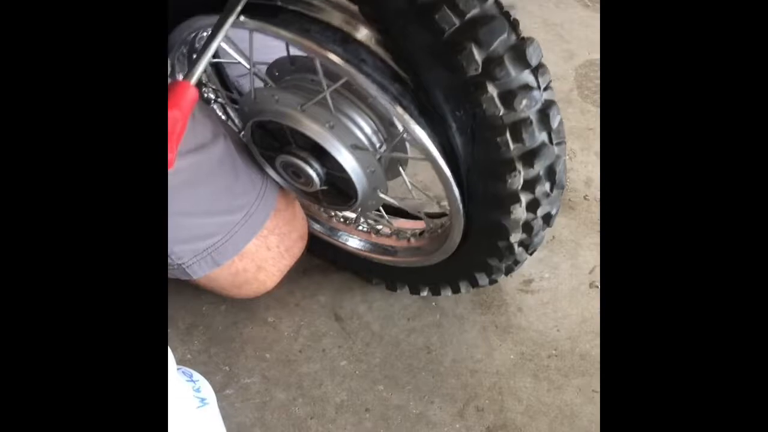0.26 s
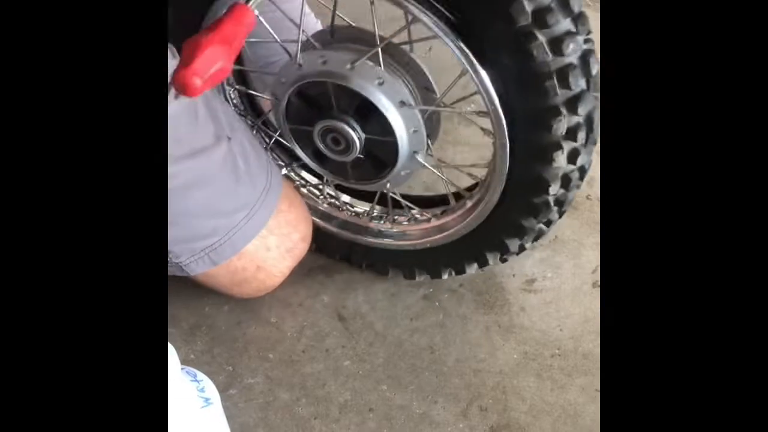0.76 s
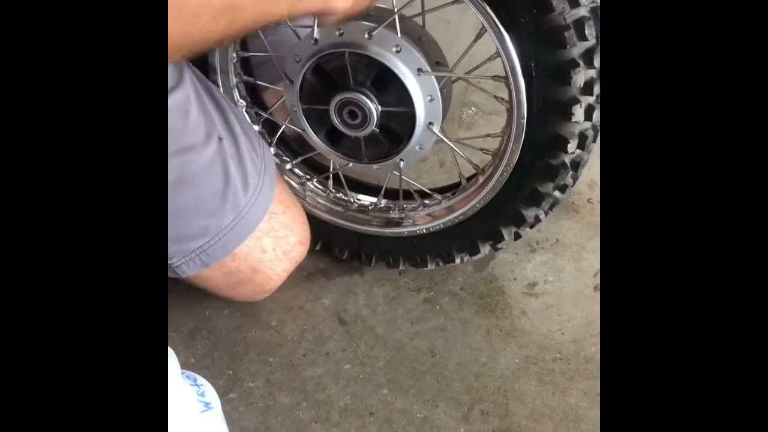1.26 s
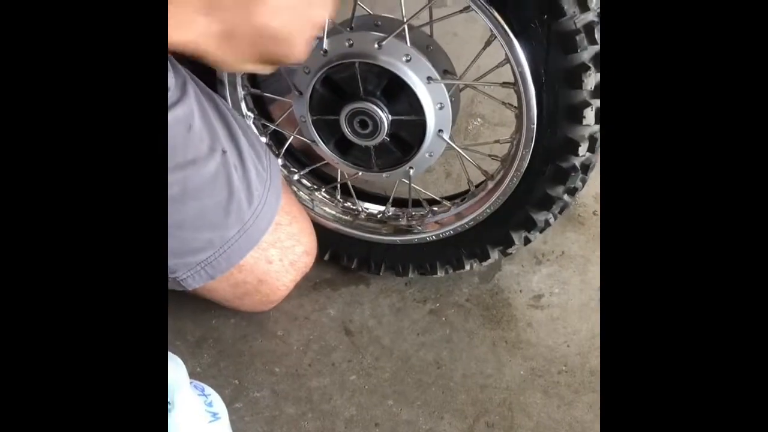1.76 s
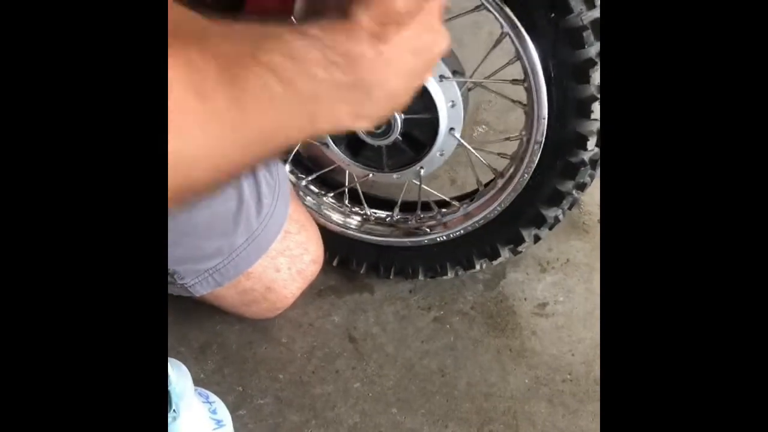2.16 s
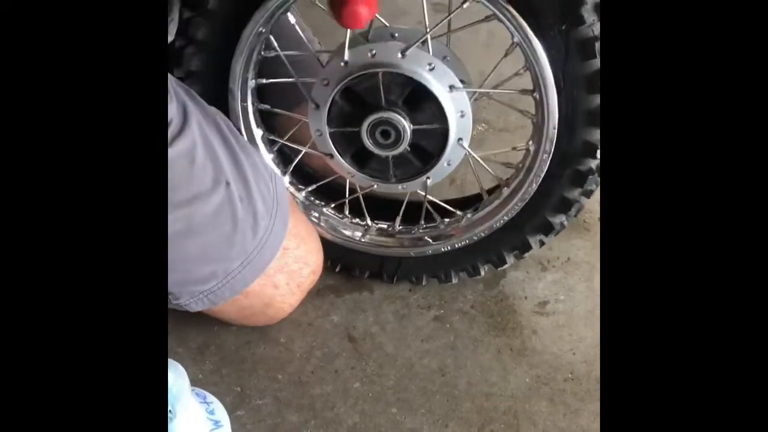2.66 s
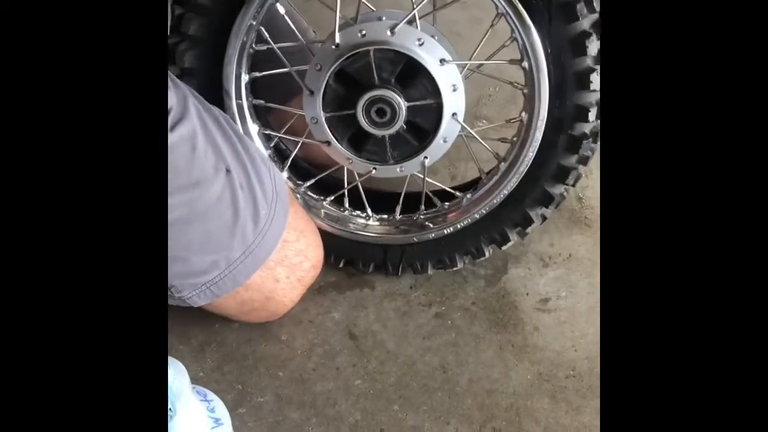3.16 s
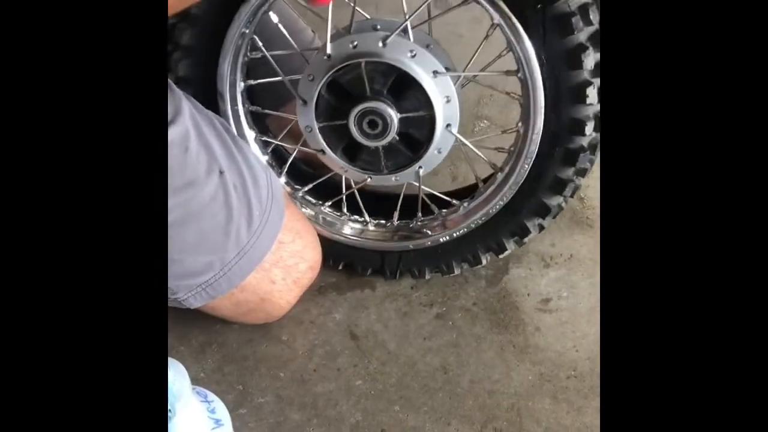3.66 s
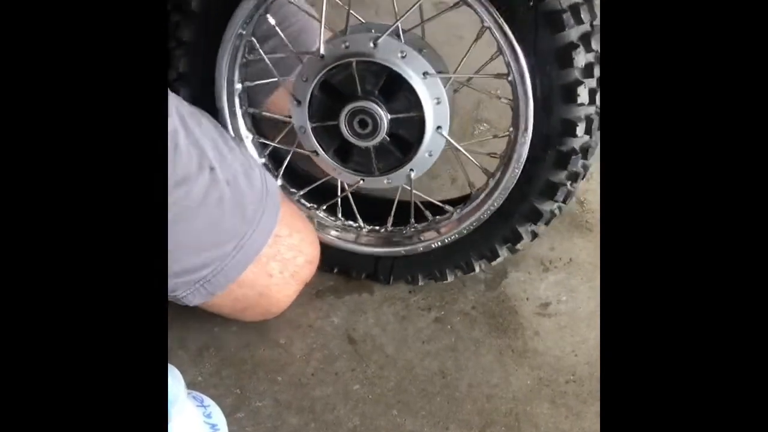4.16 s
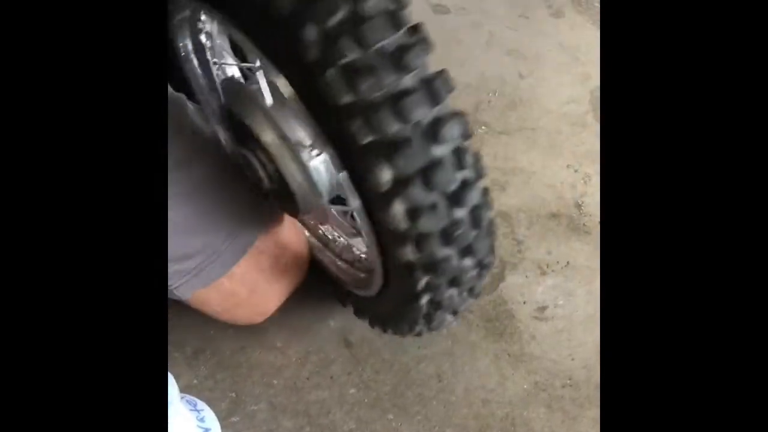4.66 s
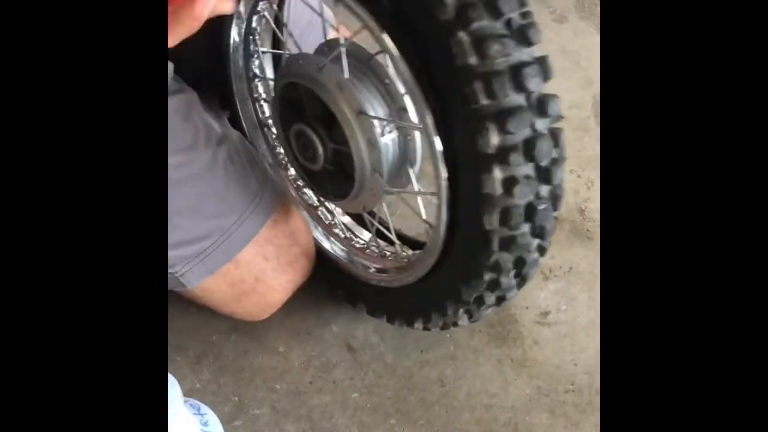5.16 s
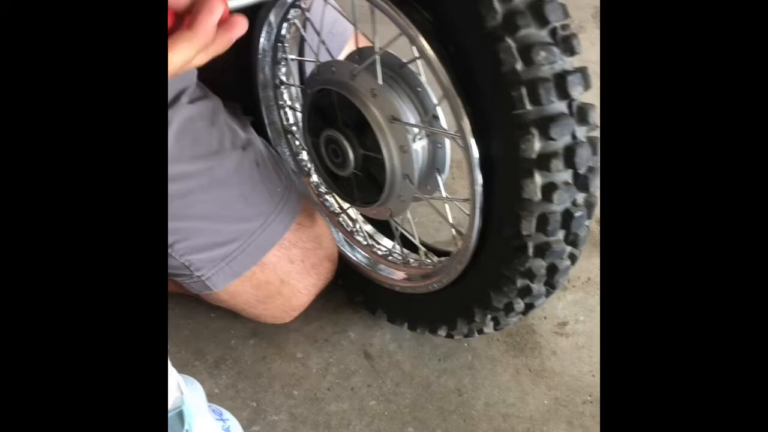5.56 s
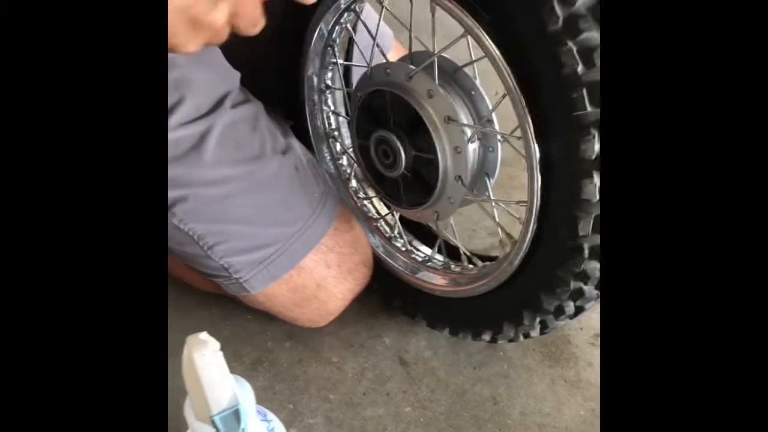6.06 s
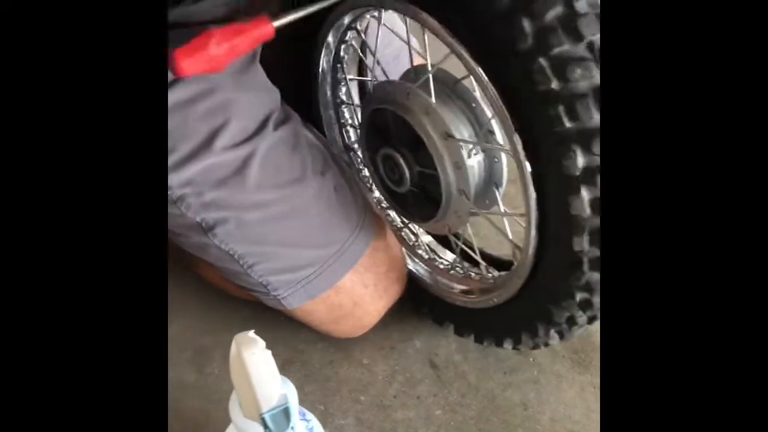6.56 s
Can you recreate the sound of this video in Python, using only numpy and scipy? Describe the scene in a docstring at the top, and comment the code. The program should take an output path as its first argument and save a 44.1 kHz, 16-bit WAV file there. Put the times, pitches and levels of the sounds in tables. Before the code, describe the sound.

Steel tire levers clink, scrape and bounce on a spoked wheel rim while rubber rubs and thumps heavily in a garage.

```python
"""Steel tire levers work a knobby tire onto a spoked wheel on a garage floor.
Over air noise and a low hum a faint steel ring dies away, while rubber rubs in strokes and thumps softly.
From 1 s a lever clinks and slides on the rim; then come groans, jerks, knocks and ever faster bounces.
Rubber rubs on with tiny snaps; a knock and loud thumps follow at 4.2 s, knocks and slides from 5.3 s,
then clinks, bounces and grinding. Blows excite damped modes, friction is many slips, and the garage rings."""
import sys
import numpy as np
from scipy import signal
from scipy.fft import rfft, irfft
from scipy.io import wavfile

SR = 44100
rng = np.random.default_rng(int(sys.argv[2]) if len(sys.argv) > 2 else 0)


def log_audio(samples):
    """Write samples as a 16-bit WAV file to the path given in sys.argv[1]."""
    # one column per channel
    frames = np.atleast_2d(samples).T
    # limit to full scale, then quantise
    limited = np.clip(frames, -1, 1)
    pcm = np.round(limited * 32767).astype(np.int16)
    wavfile.write(sys.argv[1], SR, pcm)


N = 300762
TIME = np.arange(N) / SR


def amp(db):
    """Level law: decibels to amplitude gain."""
    return 10 ** (np.asarray(db) / 20)


def rms(x):
    """Effective value: root of the mean square."""
    return np.sqrt(np.mean(x ** 2) + 1e-20)


def read(points, hz):
    """Logarithmic pitch scale: a table is interpolated over log frequency."""
    f, value = np.transpose(points)
    return np.interp(np.log(hz + 1), np.log(f + 1), value)


def add(mix, s, sound):
    """Superposition: a sound is summed into the mix from time s."""
    part = mix[max(round(s * SR), 0):][:len(sound)]
    part += sound[:len(part)]


def colour(x, points, size=4096):
    """Minimum-phase filtering: a causal filter with the given spectrum; the result has rms 1."""
    log_gain = np.log(amp(read(points, abs(np.fft.fftfreq(size, 1 / SR)))))
    spectrum = np.exp(np.conj(signal.hilbert(log_gain)))
    taps = np.fft.ifft(spectrum).real[:size // 2]
    y = signal.fftconvolve(x, taps)[:len(x)]
    return y / rms(y)


def wander(length, rate_hz):
    """Low-pass noise: slow chance with rms 1."""
    hz = np.fft.rfftfreq(length, 1 / SR)
    y = irfft(rfft(rng.standard_normal(length)) * np.exp(-(hz / rate_hz) ** 2), length)
    return y / rms(y)


# spectrum of the steady air noise: frequency_hz [Hz], density_db [dB per Hz, relative]
AIR = [(15, -42.5), (25, -18), (56, -7.5), (123, -9), (145, -11.5), (263, -17.5), (293, -19), (384, -17.5),
       (463, -23), (560, -21), (1100, -21), (2000, -33.5), (6920, -46), (11600, -50), (16000, -58.5)]
# tones of the machine hum: pitch_hz [Hz], level_db [dB rms]
HUM = [(60, -60), (83, -58.5), (119.7, -53.5)]


def background():
    """Stationary noise plus pure tones: steady air and a faint machine hum with wandering phase."""
    hum = np.zeros(N)
    for hz, db in HUM:
        phase = 2 * np.pi * hz * TIME + 0.5 * wander(N, 3.8)
        hum += amp(db) * np.sqrt(2) * np.sin(phase)
    air = amp(-50.5) * colour(rng.standard_normal(N), AIR, size=16384)
    return air + hum


# spectrum of the faint steel ring at the start: frequency_hz [Hz], density_db [dB per Hz, relative]
AFTER_RING_COLOUR = [(700, -8), (1200, -12), (1600, -3), (1850, -5.5), (2080, 6), (2350, -12), (2680, -1),
                     (3100, -10), (4700, -13), (7000, -21.5), (14000, -30)]


def after_ring(start_db=-48.5, fall_db_per_s=51.5):
    """Exponential decay: coloured noise as a steel ring that loses equal decibels in equal times."""
    return amp(start_db - fall_db_per_s * TIME) * colour(rng.standard_normal(N), AFTER_RING_COLOUR)


def effort(strokes, roundness=0.88):
    """Stroke envelope: gain swells to the hardest push and eases off, 20 dB over its rise and its fall."""
    power = np.zeros(N)
    for s, db, rise_s, fall_s in strokes:
        away = np.maximum((s - TIME) / rise_s, (TIME - s) / fall_s)
        # roundness 1 is a pointed stroke, 2 a bell
        power += amp(db - 20 * np.minimum(away, 10) ** roundness) ** 2
    return np.sqrt(power)


def friction(push, spectrum, slips_per_s, uneven_db, modes=(), width_hz=70):
    """Stick-slip: many tiny slips of uneven size excite the rubbed body and its modes."""
    pressure = amp(np.clip(uneven_db * wander(N, 90), -6, 6))
    slips = (rng.random(N) < slips_per_s / SR) * rng.standard_normal(N) * pressure
    rub = colour(slips, spectrum)
    if len(modes):
        ring = np.zeros(N)
        for hz, db, _ in modes:
            ring += amp(db) * signal.lfilter(*signal.iirpeak(hz, hz / width_hz, SR), rub)
        rub = rub + ring / rms(ring)
    return push * rub / rms(rub)


# light sliding over the tire: start_s [s, hardest push], level_db [dB rms there], rise_s [s], fall_s [s]
SLIDES = [(.4, -62, 0.86, 0.37), (.88, -56, 0.19, 0.18), (1.2, -55.5, 0.21, 0.17), (2.65, -66, 0.67, .5),
          (3.3, -56, 0.18, 0.15), (4.12, -53.5, 0.58, 0.64), (4.42, -57.5, 0.19, 0.14)]
# spectrum of that sliding: frequency_hz [Hz], density_db [dB per Hz, relative]
SLIDE_COLOUR = [(300, -31.5), (1500, -1.5), (3300, 0.5), (6000, -3), (11000, -8.5), (16000, -15.5)]


def slides(rest_db=-72):
    """Light friction: dense slips of hands on the tire, which never lie quite still."""
    push = np.hypot(effort(SLIDES), amp(rest_db))
    return friction(push, SLIDE_COLOUR, slips_per_s=12000, uneven_db=1.8)


# dull blows of rubber on rim and floor: start_s [s], level_db [dB peak], pitch_hz [Hz, centre]
THUMPS = [(0.227, -35, 788), (.374, -39, 525), (0.866, -35, 514), (1.987, -23.5, 300), (2.218, -27, 379),
          (3.308, -36, 435), (4.163, -7, 408), (4.181, -12.5, 353), (4.202, -20, 260), (4.220, -15, 407),
          (4.396, -32.5, 700), (5.367, -35.5, 340), (6.329, -10.5, 385), (6.333, -18, 153),
          (6.362, -29, 385), (6.778, -33, 310)]


def thumps(cycles=3.3, sag=0.25, scuff=1.22, size=8192):
    """Heavily damped resonance: rubber gives a few low cycles that sag in pitch as it relaxes, and a scuff."""
    out, t = np.zeros(N), np.arange(size) / SR
    for s, db, hz in THUMPS:
        decay_s = cycles / hz  # time to fall to 1/e
        fade = np.exp(-t / decay_s) * (1 - np.exp(-t * hz * 2))
        pitch_hz = hz * (1 + sag * (2 * np.exp(-t / decay_s) - 1))
        swing = fade * np.sin(2 * np.pi * np.cumsum(pitch_hz) / SR)
        shape = [(hz / 4, -20), (hz * 0.52, -4), (hz, 0), (hz * 1.32, -5), (hz * 3, -20), (hz * 12, -55)]
        puff = colour(rng.standard_normal(size) * fade, shape)
        blow = swing / rms(swing) + scuff * puff
        add(out, s, amp(db) * blow / abs(blow).max())
    return out


# rubber dragging under load: start_s [s, hardest push], level_db [dB rms there], rise_s [s], fall_s [s]
DRAGS = [(.88, -43, 0.061, 0.076), (1.14, -47, .15, 0.11), (4.185, -22.5, 0.028, 0.083),
         (6.16, -30.5, 0.16, 0.097), (6.42, -42, .15, 0.1)]
# spectrum of that dragging: frequency_hz [Hz], density_db [dB per Hz, relative]
DRAG_COLOUR = [(40, -24), (90, -5), (220, -3.5), (420, -5), (600, -6.5), (1000, -17.5), (2000, -22),
               (8000, -47)]


def drags():
    """Loaded friction: sparser slips of pressed rubber give a low rub."""
    return friction(effort(DRAGS), DRAG_COLOUR, slips_per_s=1000, uneven_db=1.0)


def contact_force(t, crack_s, rattle_db=-21, rattle_s=.018):
    """Impact force: a crack of a few ms, then a brief buzz of loose spokes."""
    push = (t / crack_s) ** .5 * np.exp(-(t / crack_s) ** 1.12)
    return push / push.max() + amp(rattle_db) * np.exp(-t / rattle_s)


def contact_notes(t, first_hz, second_hz, t60, crack_s):
    """Selective excitation: the contact point picks two short notes, which waver as the lever shifts."""
    clock = np.cumsum(1 + .018 * wander(len(t), 200)) / SR
    notes = np.sin(2 * np.pi * first_hz * clock) + 0.39 * np.sin(2 * np.pi * second_hz * clock)
    return notes * amp(-60 * t / t60) * (1 - np.exp(-2 * t / crack_s))


def modal_ring(t, modes, split, damping, crack_s):
    """Modal superposition: decaying beating pairs, shifted by the grip and roughened by spokes and bead."""
    ring = np.zeros(len(t))
    for hz, db, t60 in modes:
        pair = hz * (1 + split * rng.standard_normal((2, 1)))
        beating = np.sin(2 * np.pi * (pair * t + rng.random((2, 1)))).sum(0)
        ring += amp(db - 60 * damping * t / t60) * beating
    return ring * (1 - np.exp(-t / crack_s)) * (1 + .7 * wander(len(t), 140))


def blows(rows, spectrum, modes, crack_s, second_hz, ring_db, notes_db, notes_t60, gain_db, spread_s,
          split, damping, softness, size=16384):
    """Impact excitation: each steel blow is a crack, contact notes and ringing modes, set in three bands."""
    out, t, hz = np.zeros(N), np.arange(size) / SR, np.fft.rfftfreq(size, 1 / SR)
    bass = 1 / (1 + (hz / 1300) ** 12)
    treble = 1 - 1 / (1 + (hz / 5500) ** 12)
    octaves_up = np.log2(np.maximum(hz / 5500, 1))
    attack = round(.012 * SR)  # levels are rms over these first 12 ms
    # bending waves are dispersive: low notes arrive later, by spread_s at 1 kHz
    lag = np.exp(-4j * np.pi * spread_s * np.sqrt(hz * 1000))
    for s, middle_db, bass_db, treble_db, first_hz in rows:
        crack = colour(contact_force(t, crack_s) * rng.choice([-1., 1.], size), spectrum)
        notes = contact_notes(t, first_hz, second_hz, notes_t60, crack_s)
        ring = modal_ring(t, modes, split, damping, crack_s)
        sound = crack / rms(crack[:attack])
        sound += amp(notes_db) * notes / rms(notes[:attack])
        sound += amp(ring_db) * ring / rms(ring[:attack])
        z = lag * rfft(sound)
        # a softer contact has less treble, and its treble falls away more steeply
        top = treble * amp(softness * min(treble_db - middle_db, 0) * octaves_up)
        for share, db in (bass, bass_db), (1 - bass - treble, middle_db), (top, treble_db):
            part = irfft(z * share)
            add(out, s - spread_s / 2, amp(gain_db + db) * part[:size * 3 // 4] / rms(part[:attack]))
    return out


def bounces(runs, ratio=.855, dulling=1.7):
    """Restitution: a springy lever rebounds ever sooner; blows hold up at first, then turn weak and dull."""
    rows = []
    for start, gap_s, length_s, middle_db, bass_db, treble_db, fall_db, hz in runs:
        # each gap is the same share of the one before
        ages = gap_s * (1 - ratio ** np.arange(20)) / (1 - ratio)
        ages = ages[ages <= length_s]
        losses_db = fall_db * np.linspace(0, 1, len(ages)) ** 2
        for age, lost_db in zip(ages, losses_db):
            # treble loses more decibels than the rest
            bands_db = middle_db - lost_db, bass_db - lost_db, treble_db - dulling * lost_db
            rows.append((start + age, *bands_db, hz))
    return rows


# single clinks of a loosely held lever: start_s [s], middle_db, bass_db, treble_db [dB before the
# common gain], pitch_hz [Hz, strongest note]
CLINKS = [(0.9916, -29.5, -41, -38, 4470), (1.0901, -28, -42, -35.5, 4257), (1.4338, -44.5, -55, -62, 2830),
          (2.2258, -22, -35, -26, 3670), (5.6962, -20.5, -42.5, -21.5, 2520),
          (5.8464, -31.5, -55.5, -46, 2680), (5.9713, -27, -56, -36.5, 2670), (6.0473, -34, -45, -42, 2460),
          (6.1088, -14.5, -31.5, -17, 2650), (6.1278, -31, -39, -49, 2380),
          (6.3544, -18.5, -52, -23.5, 2500), (6.4002, -18.5, -38, -23, 1570),
          (6.662, -17.5, -30, -16.5, 2920), (6.6787, -20, -32.5, -20, 4860),
          (6.6861, -21.5, -31, -27, 2300)]
# bounces of the loose lever: start_s [s], first_gap_s [s], length_s [s], middle_db, bass_db, treble_db
# [dB before the common gain], fall_db [dB by the last bounce], pitch_hz [Hz, strongest note]
CLINK_BOUNCES = [(6.161, .0198, .07, -28, -42.5, -35, 1.6, 2220),
                 (6.4345, 0.021, .043, -21.5, -32, -28, 10, 1587),
                 (6.4911, .0172, .039, -25.5, -34, -32, 7.2, 1660)]
# spectrum of that contact: frequency_hz [Hz], density_db [dB per Hz, relative]
CLINK_COLOUR = [(100, -30.5), (400, -9), (600, -10.5), (780, 4.5), (1200, -20.5), (1550, 1), (2400, 0.5),
                (3900, -5), (5000, -3.5), (7000, -9), (9500, -9), (13000, -16.5), (16000, -27.5)]
# modes of the loose lever: pitch_hz [Hz], level_db [dB, relative], t60_s [s before the extra damping]
LOOSE_LEVER = [(400.8, -1.5, 0.31), (754, -7.5, 0.18), (1605, -1, 0.17), (2080, -10.5, 0.44),
               (2215, -12.5, 0.5), (2632, -2.5, 0.098), (2908, 0.5, 0.11), (3130, -8, 0.23),
               (3550, -4.5, 0.28), (5030, -5.5, 0.15), (5580, -15.5, 0.15), (6570, -4, .22),
               (7960, -9, 0.16), (9330, -6, 0.14)]


def clinks():
    """Free bar vibration: a loosely held lever clinks and bounces on the rim."""
    return blows(CLINKS + bounces(CLINK_BOUNCES), CLINK_COLOUR, LOOSE_LEVER, crack_s=.0025,
                 second_hz=2072, ring_db=-5.0, notes_db=-4.0, notes_t60=0.031, gain_db=-1.5,
                 spread_s=.0018, split=.005, damping=2.6, softness=.7)


# lever sliding along the rim: start_s [s, hardest push], level_db [dB rms there], rise_s [s], fall_s [s]
RIM_SCRAPES = [(1.17, -43.5, 0.064, 0.042), (1.52, -48, .07, .07), (5.49, -38.5, 0.052, 0.056),
               (5.6, -34.5, 0.08, 0.044)]
# spectrum of that sliding: frequency_hz [Hz], density_db [dB per Hz, relative]
RIM_SCRAPE_COLOUR = [(300, -21), (1200, -17), (1650, -1), (2300, -9), (3050, 0.5), (3600, -1.5),
                     (4700, -2.5), (6000, -9), (10000, -19.5), (16000, -37)]
# modes of the wheel: pitch_hz [Hz], level_db [dB, relative], t60_s [s before a blow's extra damping]
WHEEL = [(734, -13, 0.31), (972.6, -2.5, 0.31), (1605, -7.5, 0.83), (1603, -4.5, .35), (2415, -1.5, .25),
         (3010, -2, 0.43), (3565, -5, 0.36), (3693, -12, 0.6), (4530, -6, 0.3), (4700, -15, 0.53),
         (5230, -12.5, 0.25), (6500, -10, 0.38), (7330, -2, 0.085), (7540, -7, 0.33), (9700, -13, 0.41),
         (10900, -7, 0.16)]


def rim_scrapes():
    """Friction-driven resonance: slips of the lever along the rim excite the wheel's modes."""
    return friction(effort(RIM_SCRAPES), RIM_SCRAPE_COLOUR, slips_per_s=4400, uneven_db=4.0, modes=WHEEL)


# low groans of the bent lever: start_s [s], level_db [dB, before rise and decay]
GROANS = [(1.444, -37.5), (1.697, -14.5), (1.788, -34.5), (1.853, -29)]


def groan(hz=394, waver=.04, rise_s=0.0087, decay_s=0.052, uneven_db=2.5):
    """Damped bending vibration: at a few moments the lever's lowest mode swings, damped by hand and rubber."""
    swing = np.zeros(N)
    for s, db in GROANS:
        age = np.maximum(TIME - s, 0)
        swing += amp(db) * (1 - np.exp(-age / rise_s)) * np.exp(-age / decay_s)
    swing *= amp(uneven_db * wander(N, 99))
    pitch_hz = hz * (1 + waver * wander(N, 60))
    return swing * np.sin(2 * np.pi * np.cumsum(pitch_hz) / SR)


# single jerks of a loaded lever along the rim: start_s [s], middle_db, bass_db, treble_db [dB],
# pitch_hz [Hz, strongest note]
JERKS = [(1.5542, -30, -43.5, -39, 2740), (1.9582, -26.5, -44, -32.5, 2880),
         (1.9813, -20, -32, -22.5, 3580), (2.0441, -37, -36, -37, 5270)]
# bounces of the loaded lever: start_s [s], first_gap_s [s], length_s [s], middle_db, bass_db, treble_db
# [dB], fall_db [dB by the last bounce], pitch_hz [Hz, strongest note]
JERK_BOUNCES = [(1.6868, .0503, .2, -16.5, -32.5, -16, 10, 2834),
                (1.8971, .0178, .052, -19, -35.5, -19.5, 9, 2835)]
# spectrum of that contact: frequency_hz [Hz], density_db [dB per Hz, relative]
JERK_COLOUR = [(100, -28), (400, -9.5), (600, -18), (900, -11.5), (1200, -19.5), (1700, -8), (2300, -9),
               (2850, 2.5), (3900, -11.5), (4700, -2.5), (8000, -3.5), (11000, -7.5), (16000, -21)]
# modes of the loaded lever: pitch_hz [Hz], level_db [dB, relative], t60_s [s before the extra damping]
LOADED_LEVER = [(1588, -9.5, 0.9), (2072, -8, 0.85), (2252, -6.5, 0.65), (2380, -11, 0.12),
                (2850, -1.5, 0.43), (2940, -2, 0.13), (3380, -8.5, 0.83), (4740, -9.5, 0.71),
                (5830, -10, 0.4), (6282, -5, 0.19), (6590, 2, 0.5), (7200, -10.5, .25), (8200, -3.5, 0.15),
                (9420, -5.5, 0.48), (10100, -12.5, .2)]


def jerks():
    """Loaded bar vibration: a lever under load jerks along the rim and bounces on it."""
    return blows(JERKS + bounces(JERK_BOUNCES), JERK_COLOUR, LOADED_LEVER, crack_s=.003,
                 second_hz=3447, ring_db=-12, notes_db=-7.0, notes_t60=0.044, gain_db=0.0,
                 spread_s=.0012, split=0.0018, damping=2.9, softness=0.37)


# blows that ring the whole wheel: start_s [s], middle_db, bass_db, treble_db [dB before the common gain],
# pitch_hz [Hz, strongest note]
KNOCKS = [(1.6277, -10.5, -19.5, -20.5, 2500), (4.1603, -14.5, -18.5, -23, 3150),
          (4.1825, -23, -41, -33, 2900), (4.2196, -24, -46, -36, 3660), (4.2493, -22.5, -46, -33, 3700),
          (5.2891, -16, -35, -16.5, 3570), (5.6558, -28.5, -41, -30, 3590)]
# spectrum of that contact: frequency_hz [Hz], density_db [dB per Hz, relative]
KNOCK_COLOUR = [(100, -29), (350, -8.5), (600, -15), (980, -5.5), (1230, -19), (1650, 4.5), (2000, -7),
                (3300, -7.5), (4400, -2), (6000, -7.5), (7600, -6), (11000, -13.5), (16000, -24)]


def knocks():
    """Struck-body resonance: the lever's blow rings the modes of the whole wheel."""
    return blows(KNOCKS, KNOCK_COLOUR, WHEEL, crack_s=.0033,
                 second_hz=1610, ring_db=-9.5, notes_db=-7, notes_t60=0.05, gain_db=-2.0,
                 spread_s=.0015, split=.004, damping=3.1, softness=0.38)


# lever grinding under the bead: start_s [s, hardest push], level_db [dB rms there], rise_s [s], fall_s [s]
SCRAPES = [(1.7, -24.5, .04, 0.22), (6.16, -33.5, 0.1, 0.13), (6.345, -20, .025, 0.059),
           (6.52, -46.5, .08, 0.65)]


def scrapes():
    """Steel friction: slips of the lever grinding under the bead, coloured like its clinks."""
    return friction(effort(SCRAPES), CLINK_COLOUR, slips_per_s=2000, uneven_db=-1.3)


# tiny snaps of sticky rubber: start_s [s], level_db [dB, 3 dB below the peak]
SNAPS = [(2.4775, -40), (2.6172, -46.5), (2.7676, -46.5), (2.824, -39.5), (2.863, -40), (3.771, -47)]


def snaps(decay_s=0.0029, size=1024):
    """Adhesion release: sticky rubber lets go with tiny bright ticks."""
    out, t = np.zeros(N), np.arange(size) / SR
    shape = [(1000, -25), (4000, -6.0), (9000, -2.5), (16000, -10.5)]
    for s, db in SNAPS:
        tick = colour(rng.standard_normal(size) * np.exp(-t / decay_s), shape)
        add(out, s, amp(db + 3) * tick / abs(tick).max())
    return out


# reverberation of the garage: frequency_hz [Hz], t60_s [s]
GARAGE = [(100, 0.25), (400, .55), (1000, 0.47), (2500, 0.52), (6000, 0.46), (10000, 0.3), (16000, 0.41)]


def garage(x, wet_db, build_s):
    """Reverberation: dense reflections from floor and walls, each band dying at its own speed."""
    t = np.arange(SR) / SR
    reflections = rng.standard_normal(SR) * (rng.random(SR) < 4000 / SR)
    taps = reflections * (1 - np.exp(-(t / build_s) ** 2))
    hz, frame_s, z = signal.stft(taps, SR, nperseg=256)
    decay = amp(-60 * frame_s / read(GARAGE, hz)[:, None])
    tail = signal.istft(z * decay, SR, nperseg=256)[1]
    return x + amp(wet_db) * signal.fftconvolve(x, tail / np.linalg.norm(tail))[:N]


def scene():
    """Superposition: steel and rubber ring in the garage over the after-ring and the background."""
    rubber = slides() + thumps() + drags() + snaps()
    steel = clinks() + rim_scrapes() + groan() + jerks() + knocks() + scrapes()
    room = garage(steel, wet_db=-10.5, build_s=0.005) + garage(rubber, wet_db=-9.0, build_s=0.0083)
    return (room + after_ring() + background())[None]


def record(dry):
    """Transducer limits: the microphone drops deepest bass and rounds loudest peaks; then the band limit."""
    thin = signal.sosfilt(signal.butter(6, 42, "highpass", fs=SR, output="sos"), dry)
    rounded = thin / (1 + thin ** 8) ** .125
    band_limit = signal.firwin(151, 16100, window=("kaiser", 9), fs=SR)  # low-pass at 16.1 kHz
    return signal.oaconvolve(rounded, band_limit[None], "same")


dry = scene()
out = record(dry)
log_audio(out)
```